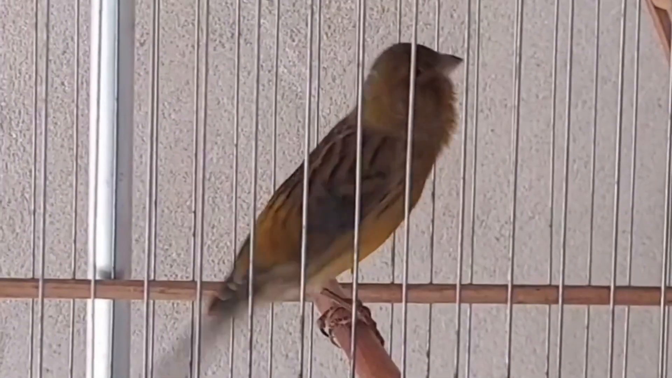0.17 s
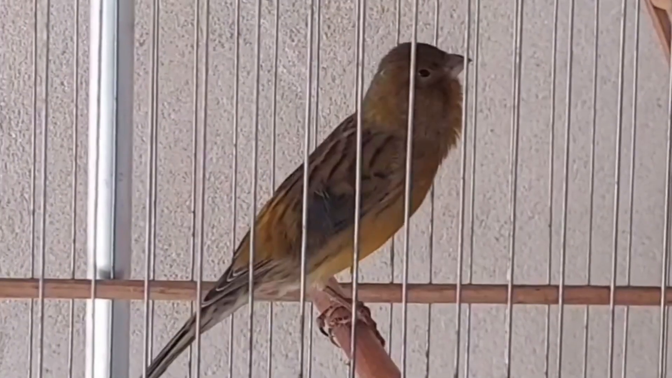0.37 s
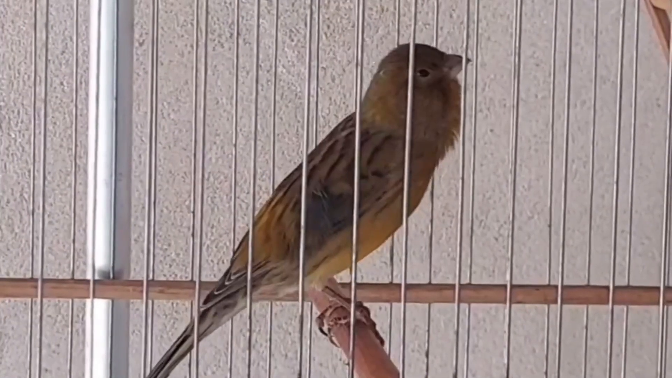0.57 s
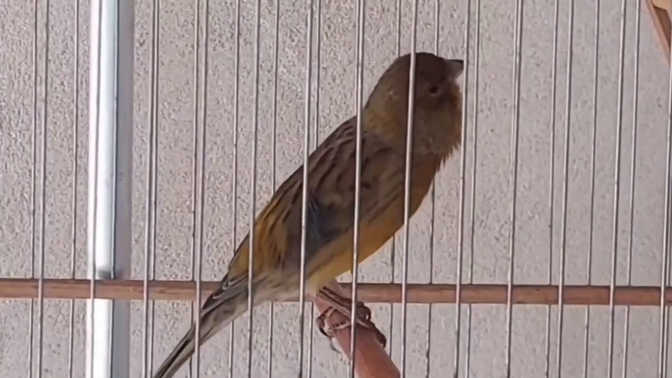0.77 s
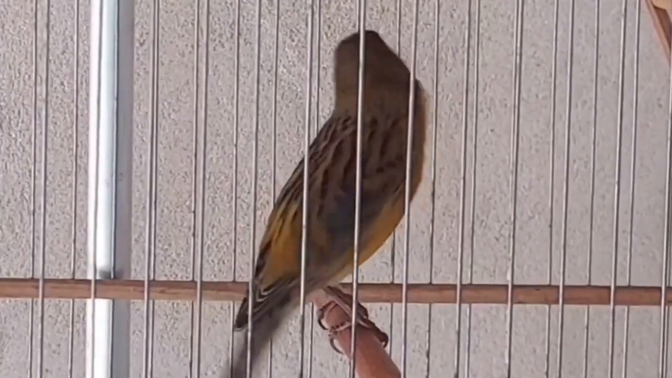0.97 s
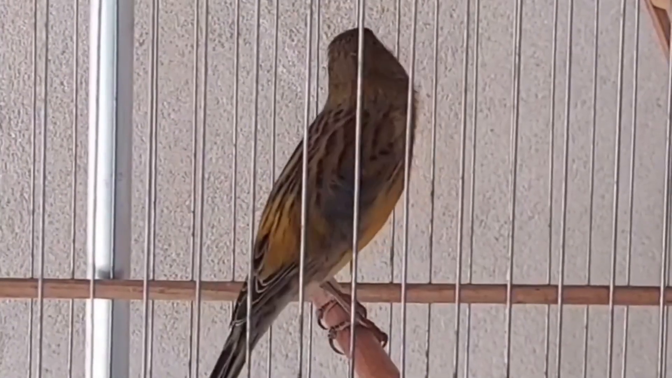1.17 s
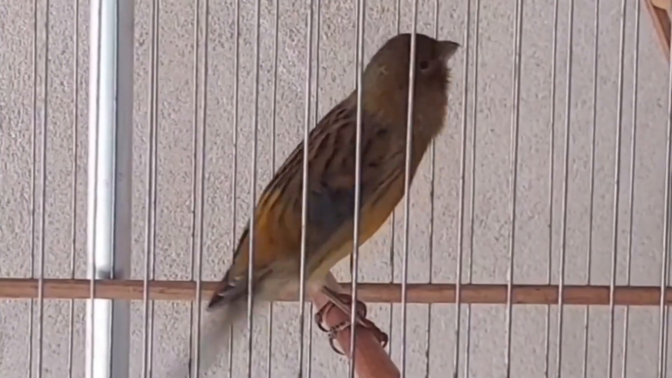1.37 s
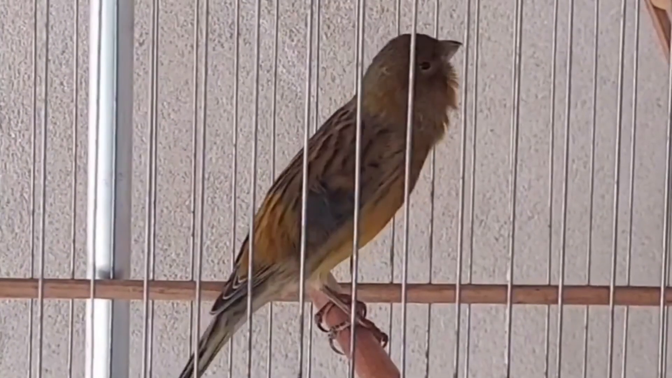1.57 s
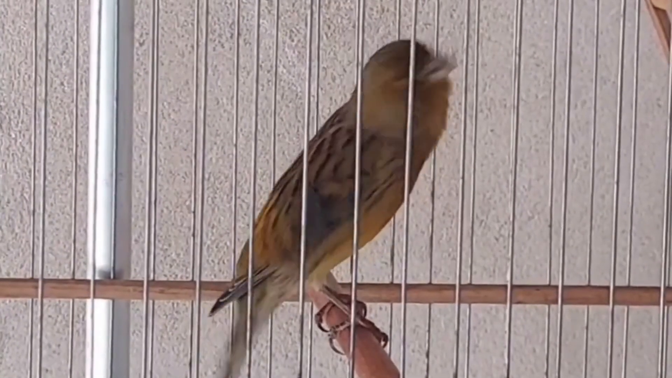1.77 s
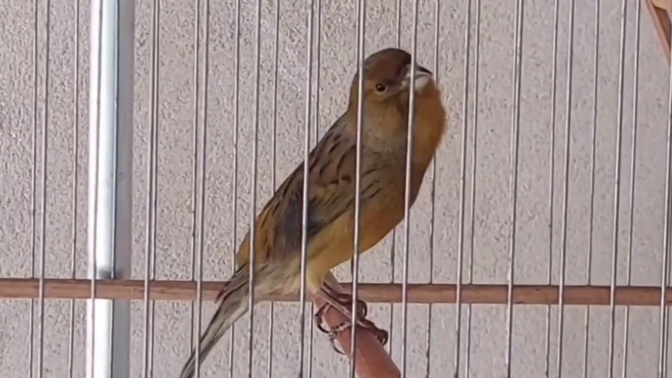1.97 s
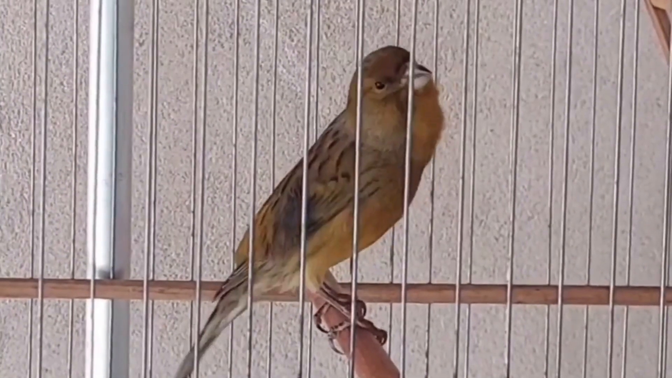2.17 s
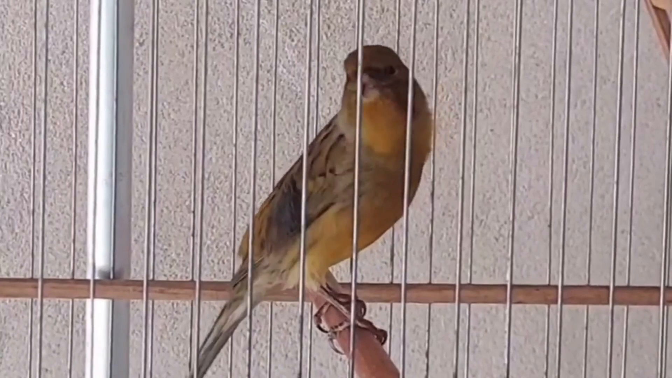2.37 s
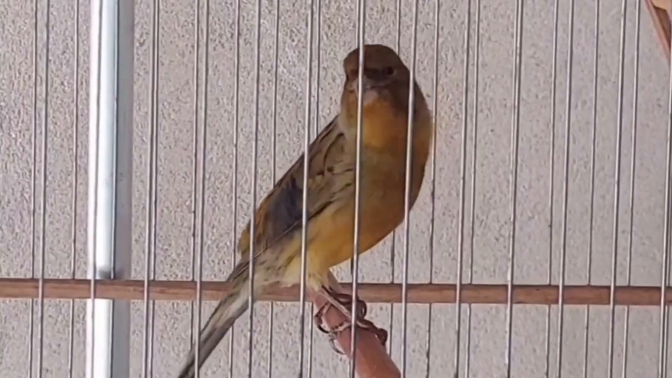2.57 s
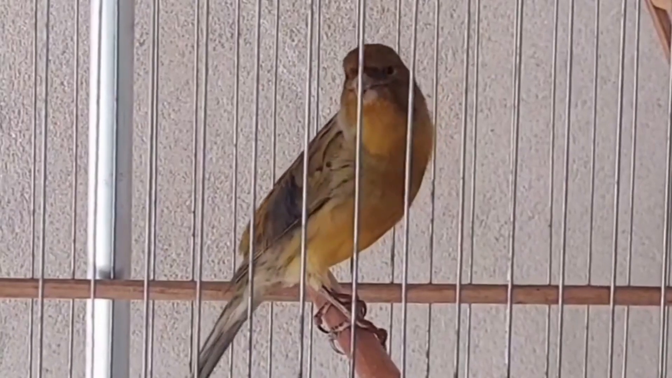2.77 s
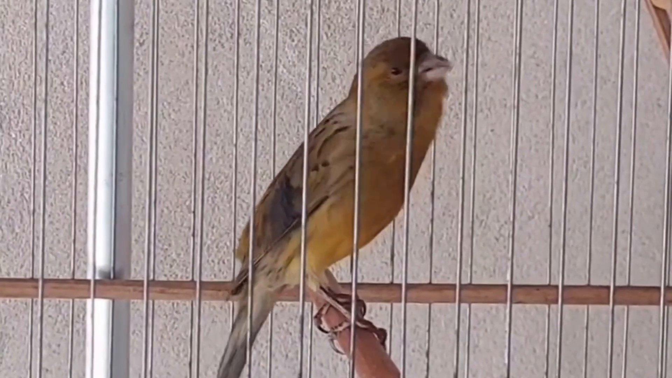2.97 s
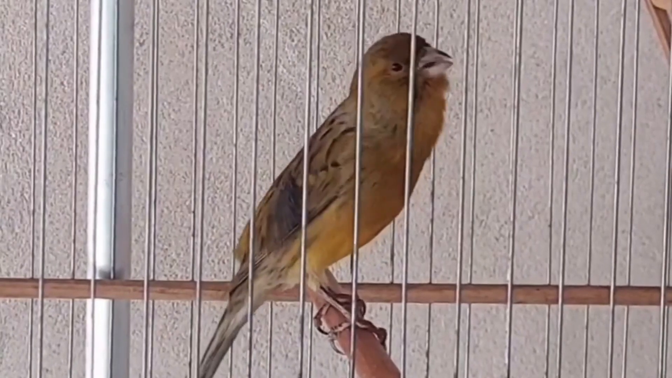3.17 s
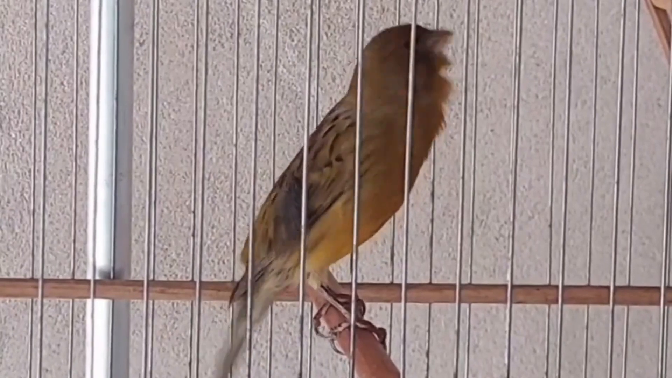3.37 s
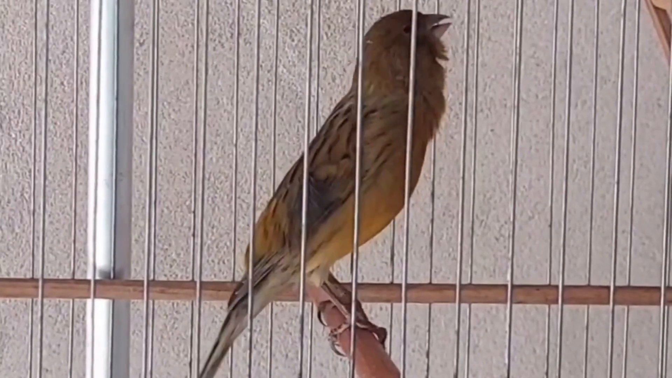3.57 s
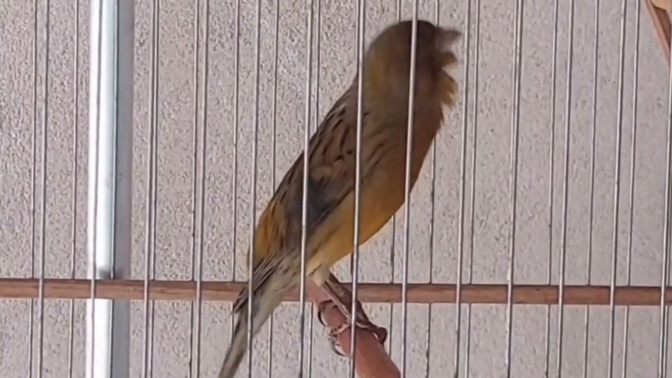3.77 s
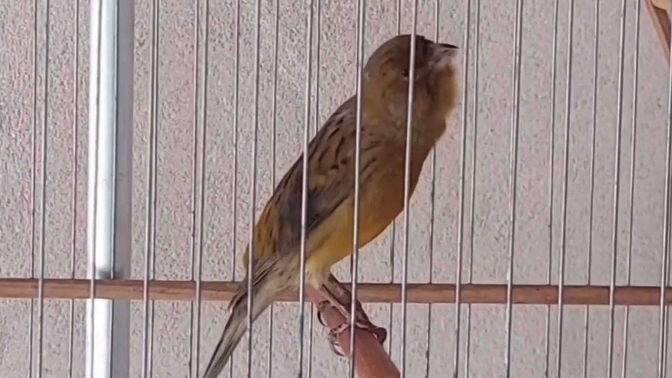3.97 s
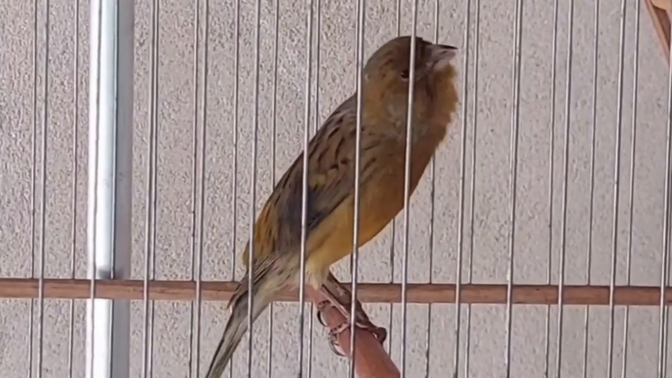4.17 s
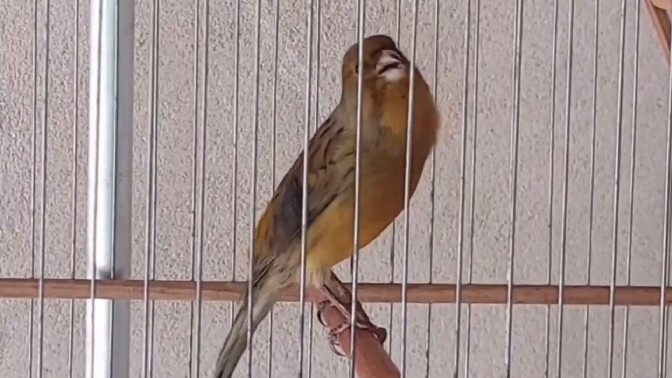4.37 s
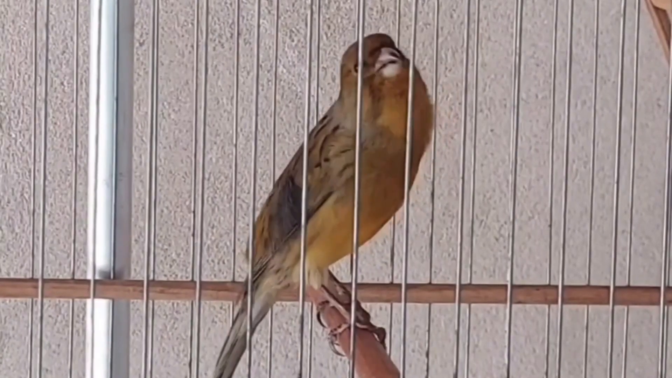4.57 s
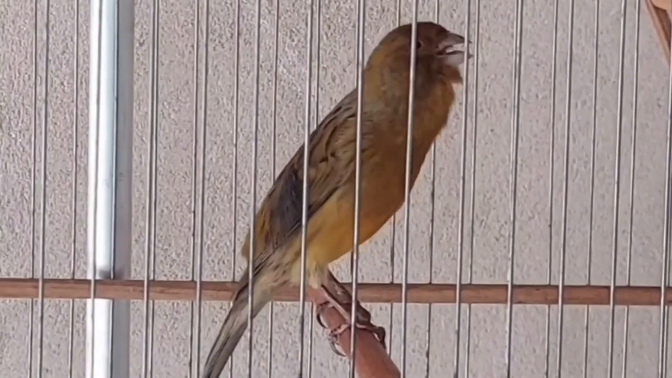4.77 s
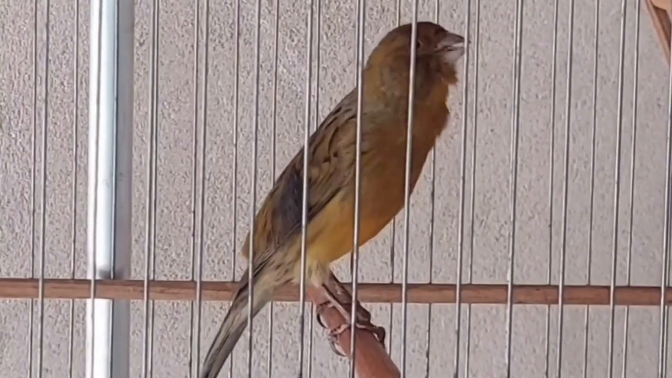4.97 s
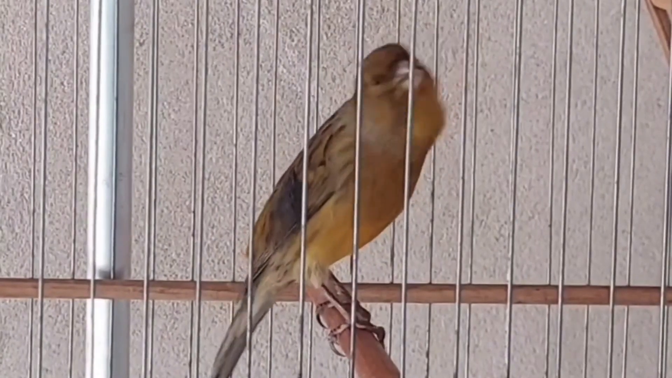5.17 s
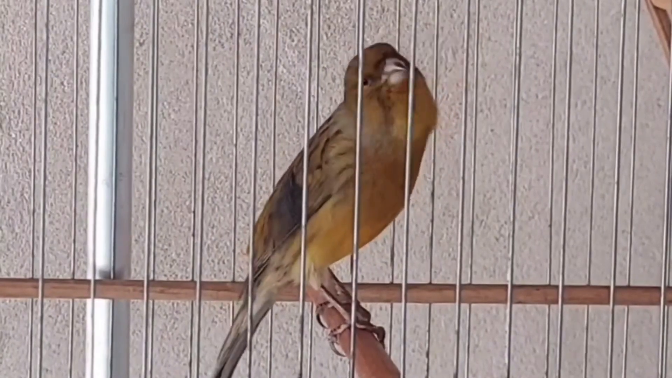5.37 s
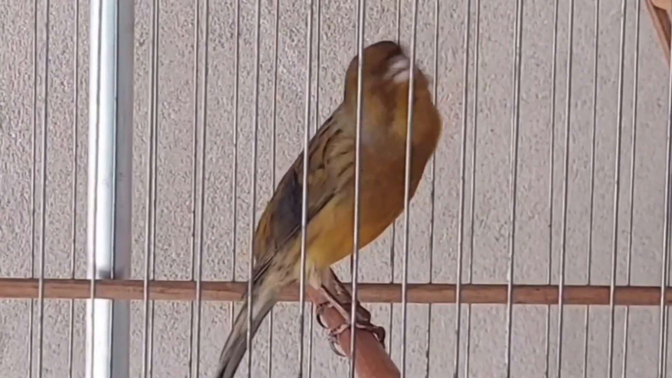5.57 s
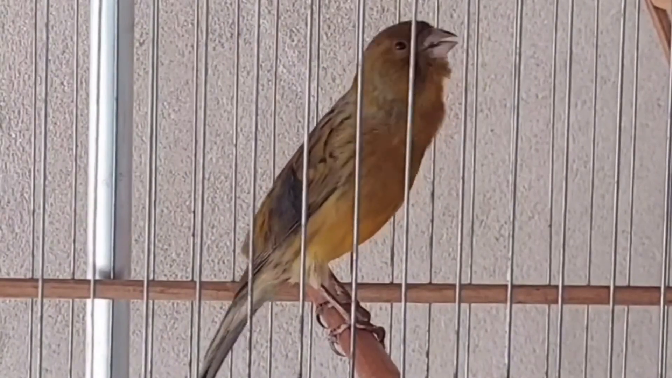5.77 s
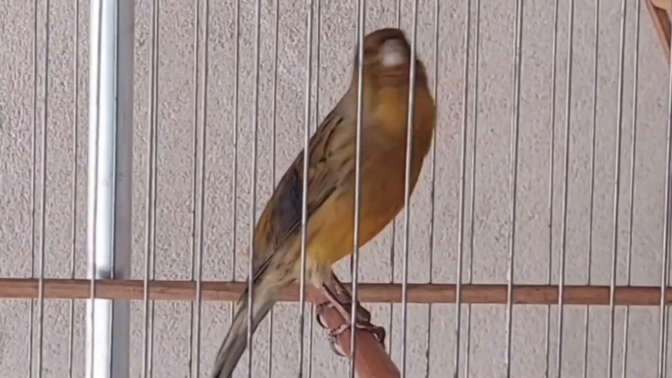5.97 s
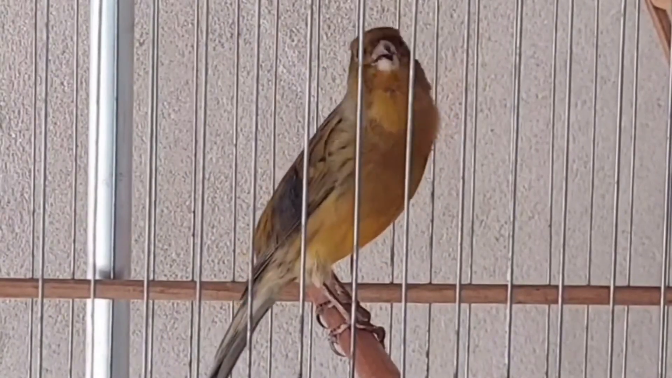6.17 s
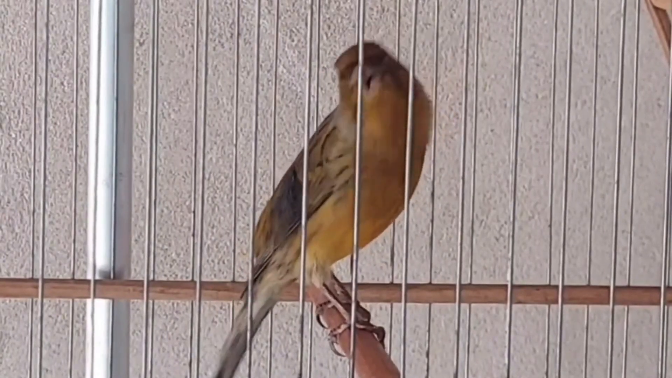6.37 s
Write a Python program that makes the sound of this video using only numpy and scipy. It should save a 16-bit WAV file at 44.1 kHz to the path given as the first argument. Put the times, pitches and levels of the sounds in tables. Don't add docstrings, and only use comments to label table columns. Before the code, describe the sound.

A caged canary sings close by in a bright hard-walled room: a fast chirping trill, a short gap, then falling whistles growing longer and slower.

```python
import sys
import numpy as np
from scipy import signal
from scipy.fft import rfft, irfft
from scipy.io import wavfile
from scipy.ndimage import uniform_filter1d

SR = 44100
rng = np.random.default_rng(int(sys.argv[2]) if len(sys.argv) > 2 else 0)


def boost_factor(decibels):
    exponent = np.asarray(decibels, float) / 20
    return 10 ** exponent


def transcribe(signal):
    frames = np.atleast_2d(signal).T
    limited = np.clip(frames, -1, 1)
    pcm = np.round(limited * 32767).astype(np.int16)
    wavfile.write(sys.argv[1], SR, pcm)


N = 286650
T = np.arange(N) / SR


def curves(table):
    s, *columns = np.transpose(table)
    return [np.interp(T, s, column) for column in columns]


def walk(rate_hz):
    hold = int(SR / rate_hz)
    steps = np.repeat(rng.standard_normal(N // hold + 1), hold)
    return 1.6 * uniform_filter1d(uniform_filter1d(steps, hold), hold)[:N]


def shaped(x, points):
    hz, db = np.transpose(points)
    log_f = np.log(np.fft.rfftfreq(x.shape[-1], 1 / SR) + 1)
    gain = boost_factor(np.interp(log_f, np.log(hz), db, left=-90, right=-90))
    return irfft(rfft(x) * gain, x.shape[-1])


def band(x, lo_hz, hi_hz):
    return x / np.std(shaped(x, [(lo_hz, 0), (hi_hz, 0)]))


# f/Hz, likeness (0-1)
LIKENESS = [(40, .6), (130, 0.78), (290, 0.84), (630, 0.44), (1400, 0)]


def stereo_noise():
    hz, like = np.transpose(LIKENESS)
    log_f = np.log(np.fft.rfftfreq(N, 1 / SR) + 1)
    like = np.clip(np.interp(log_f, np.log(hz), like), 0, 1)
    mid, side = rfft(rng.standard_normal((2, N)))
    return irfft(mid * np.sqrt(1 + like) + side * np.sqrt(1 - like) * np.array([[1], [-1]]), N)


# t/s, level/dB
ROAD = [(0, -53.5), (.95, -52.5), (1.7, -49), (3.3, -52.5), (4.4, -56), (5.65, -56), (6.5, -54)]
# f/Hz, level/dB per Hz
ROAD_COLOUR = [(15, -61), (25, -29), (43, -14.5), (94, -4.5), (173, -8), (199, -7.5), (253, -6), (356, -12),
               (810, -12), (945, -17), (1500, -19.5), (1950, -50), (3300, -120)]
# middle t/s, length/s, f/Hz, level/dB
DRONES = [(.13, 0.45, 175, -51), (0.52, .2, 184, -53), (1.2, 0.82, 171, -50.5), (1.8475, 1.8, 175.7, -57),
          (2.37, .25, 177, -54), (3.051, 0.45, 174, -48), (3.25, 0.21, 172, -48),
          (3.62, 0.27, 173.5, -46.5), (3.828, 0.24, 165, -43), (4.073, .3, 169, -50.5),
          (4.596, .15, 171, -57), (0.85, 0.17, 245, -48), (1.165, 0.59, 246, -45),
          (2.103, 1.58, 255.6, -49), (2.908, 0.41, 255.5, -48), (3.5, 0.77, 180, -51),
          (1.77, 2.9, 340, -57.5), (0.025, .25, 120, -53.5), (1.9, 0.67, 156, -49), (3.6, 0.43, 138, -59),
          (1.07, .5, 140, -52.5), (4.55, 1.4, 210, -57), (2.3, 6.4, 140, -60), (2.26, 5.2, 160, -52)]
# multiple of its pitch, level/dB when nearest
ENGINE_ORDERS = [(1, -52.5), (2, -52), (3, -53)]
# f/Hz, level/dB per Hz
HISS = [(3060, -29), (5200, 14.5), (10100, 11), (10700, -24), (11200, -59), (13100, 3.5), (14000, -27)]


def traffic():
    (road_db,) = curves(ROAD)
    road = shaped(stereo_noise(), ROAD_COLOUR)
    rumble = shaped(road, [(20, 5), (120, 2.0), (140, -24)])
    out = band(road - rumble, 312, 782) * boost_factor(road_db + 0.54 * walk(8.4))
    rumble_db = -52.5 + 0.63 * (road_db - road_db.mean())
    out += band(rumble, 45, 130) * boost_factor(rumble_db + np.array([[-1.5], [1.5]]))

    turns = np.cumsum(1 + 0.0082 * walk(6.5)) / SR
    flicker = boost_factor(walk(8))
    for middle_s, length_s, hz, db in DRONES:
        swell = np.cos(np.pi * np.clip((T - middle_s) / length_s, -.5, .5)) ** 2
        out += np.sqrt(2) * boost_factor(db) * swell * flicker * np.sin(2 * np.pi * hz * turns)

    engine_hz, nears_db_per_s, abreast_s = 81.4, 17.5, 6.2
    near = boost_factor(nears_db_per_s * np.minimum(T - abreast_s, 0) + 1.7 * walk(4.6))
    for order, db in ENGINE_ORDERS:
        out += np.sqrt(2) * near * boost_factor(db) * np.sin(2 * np.pi * order * engine_hz * T + order)

    murmur = shaped(rng.standard_normal((2, N)), [(1500, 7), (5200, -9.5)])
    out += band(murmur, 1000, 3900) * boost_factor(road_db - 6.0)
    hiss = shaped(rng.standard_normal((2, N)), HISS)
    return out + band(hiss, 5200, 21000) * boost_factor(-60.5)


# f/Hz, t60/s, level/dB
ROOM = [(1100, 1, -27.5), (2000, 0.93, -21.5), (3200, 0.73, -22), (5000, 0.58, -22.5), (7570, 0.99, -21),
        (12600, 0.67, -33)]
# t/s, left level/dB, right level/dB
ECHOES = [(.003, -9, -19.5), (.007, -13.5, -6), (.012, -11.5, -19), (.019, -10, -13), (.036, -14, -13.5)]


def room(x):
    t = np.arange(SR) / SR
    response = np.zeros((2, SR))
    mode_hz, mode_db = 12, 1.4
    modes = signal.lfilter([1], [1, 1 / mode_hz - 1], rng.standard_normal(SR // 2 + 1)) * np.sqrt(2 / mode_hz)
    mode_gain = boost_factor(mode_db * modes - 0.86)
    for k, (hz, t60, db) in enumerate(ROOM):
        below_hz = ROOM[k - 1][0] if k > 0 else hz / 2
        above_hz = ROOM[k + 1][0] if k + 1 < len(ROOM) else 16000
        noise = shaped(rng.standard_normal((2, SR)), [(below_hz, -30), (hz, db), (above_hz, -30)])
        noise = irfft(rfft(noise) * mode_gain, SR)
        decay = np.log(1000) / t60
        response += noise * np.exp(-decay * t) * np.sqrt(2 * decay / SR)
    response *= boost_factor(22.5) * np.minimum(t / 0.017, 1)
    response = response + 0.048 * response[::-1]
    for s, left_db, right_db in ECHOES:
        arrival = (np.array([s, 1.12 * s]) * SR).astype(int)
        response[[0, 1], arrival] += boost_factor([left_db, right_db]) * rng.choice([-1, 1])
    lead = int(.202 * SR)
    song = np.r_[x[:lead], x]
    return signal.fftconvolve(song[None], response, axes=1)[:, lead:lead + N]


# t/s, level/dB, top f/Hz, chirp length/s
TRILL = [
    (.011, -39.5, 4330, .012),
    (.214, -29, 4327, .015),
    (.411, -29, 4213, .013),
    (.505, -27.5, 4228, .014),
    (.6, -27.5, 4212, .015),
    (.801, -26.5, 4180, .016),
    (.97, -29, 4174, .017),
    (1.082, -24.5, 4134, .018),
    (1.334, -24, 4060, .022),
]
CHIRPS_SO_FAR = [0, 6, 12, 15, 18, 24, 29, 32, 38]
# share of length (0-1 and ringing on), share of top pitch (0-1), level/dB
CHIRP = [(0, .40, -23.5), (0.121, .5, -10.5), (0.402, .76, -4), (0.622, .92, 2.5), (.9, 0.97, -13),
         (1.251, 0.95, -15), (1.5, 0.99, -32)]


def chirps():
    share, pitch, db = np.transpose(CHIRP)
    number = np.arange(CHIRPS_SO_FAR[-1] + 1)
    effort = [np.interp(number, CHIRPS_SO_FAR, column) for column in np.transpose(TRILL)]
    pushes = rng.standard_normal(len(number))
    tracks = []
    for s, level_db, top_hz, length_s, push in zip(*effort, pushes):
        hz = pitch * top_hz * (1 + .011 * push)
        tracks.append(np.transpose([s + share * length_s, hz, db + level_db + 1.04 * push]))
    return tracks


def phrase(shape, notes):
    share, hz, db = np.transpose(shape)
    done = np.clip(share, 0, 1)
    tracks = []
    for s, length_s, lag_s, early_db, late_db in notes:
        t = s + share * length_s + lag_s * np.sin(np.pi * done)
        tracks.append(np.transpose([t, hz, db + early_db + (late_db - early_db) * done]))
    return tracks


# share of length (0-1 and ringing on), f/Hz, level/dB under the note's strength
BROKEN = [(0, 5000, -10), (.11, 4730, -1), (.2, 4580, -4), (.34, 4171, -16), (.7, 3656, -16.5),
          (.99, 2880, -.5), (1.11, 2000, -17), (1.18, 1212, -14)]
SPLIT = [(0, 4956, -13), (.06, 4795, -2.5), (.18, 4573, -1.5), (.32, 4200, -13), (.44, 3979, -27),
         (.7, 3550, -24), (.99, 2930, -.5), (1.1, 2051, -15.5), (1.17, 1300, -26.5)]
DOUBLE = [(0, 5000, -11), (.22, 4460, -1.5), (.52, 3787, -4), (.8, 3312, -21), (.99, 2903, 1),
          (1.13, 1900, -21.5), (1.17, 1240, -18)]
LOWERED = [(0, 5000, -14), (.2, 4536, -6), (.38, 4150, -2), (.55, 3804, -4.5), (.76, 3363, -16.5),
           (.99, 2915, -2), (1.09, 2500, -7.5), (1.16, 1796, -25.5)]
LONG = [(0, 5500, -6), (.08, 5052, -15.5), (.24, 4708, -5), (.52, 3820, -3.5), (.66, 3450, 2),
        (.8, 3000, -3), (.99, 2110, -10.5), (1.06, 1700, -25), (1.13, 1203, -28.5)]
HIGH = [(0, 6987, -24), (.09, 6048, -25), (.15, 5796, -14.5), (.26, 5350, -8.5), (.46, 4492, -2),
        (.6, 3915, -7), (.72, 3435, 2), (.99, 2020, -12), (1.07, 1489, -34)]
SLOW = [(0, 4795, -7.5), (.075, 4550, 1), (.14, 4112, -1.5), (.25, 3568, 2.5), (.35, 3114, -2.5),
        (.51, 2633, -3), (.69, 2220, -13.5), (.94, 1676, -26), (.99, 1162, -31.5)]
# start t/s, length/s, lag of the middle/s, early level/dB, late level/dB
BROKEN_NOTES = [
    (1.525, .080, -0.0021, -23.5, -20),
    (1.662, 0.073, 0.0056, -19, -18.5),
    (1.795, 0.076, 0.0035, -15, -20),
    (2.186, .071, -.002, -15, -20.5),
]
SPLIT_NOTES = [(1.93, 0.074, -.002, -18.5, -15), (2.057, 0.071, 0.002, -15, -17)]
DOUBLE_NOTES = [(2.314, 0.067, -.001, -14, -17), (2.449, 0.074, .001, -18, -15.5),
                (2.595, .079, .001, -13, -16.5), (2.735, .079, -.001, -11, -16.5)]
LOWERED_NOTES = [(2.874, 0.073, 0.0059, -12, -16), (3.015, .075, .003, -12, -13.5),
                 (3.156, .082, .001, -11, -17.5), (3.305, .073, 0.0044, -10, -15.5),
                 (3.442, 0.073, 0.002, -11.5, -17.5)]
LONG_NOTES = [(3.612, 0.11, -.003, -20.5, -15), (3.812, 0.11, .001, -17, -13),
              (4.022, 0.098, .001, -17, -13), (4.234, .110, -.002, -19, -13.5),
              (4.446, .120, -0.0025, -14, -16)]
HIGH_NOTES = [(4.640, 0.16, -0.0017, -14.5, -16.5), (4.882, .170, 0.0014, -18, -13),
              (5.117, .180, 0.0091, -17.5, -15)]
SLOW_NOTES = [(5.376, 0.23, .011, -19, -12), (5.665, .214, -.004, -18, -14.5),
              (5.959, .217, -.001, -17.5, -14.5), (6.251, 0.23, 0.00067, -15.5, -15.5)]
# t/s, f/Hz, level/dB
PIPS = [
    (3.575, 7100, -38),
    (3.984, 6883, -29.5),
    (4.193, 6890, -32),
    (4.404, 6960, -29.5),
    (5.114, 6740, -37),
]


def whistles():
    song = phrase(BROKEN, BROKEN_NOTES) + phrase(SPLIT, SPLIT_NOTES) + phrase(DOUBLE, DOUBLE_NOTES)
    song += phrase(LOWERED, LOWERED_NOTES) + phrase(LONG, LONG_NOTES)
    song += phrase(HIGH, HIGH_NOTES) + phrase(SLOW, SLOW_NOTES)
    tracks = []
    for note in song:
        s, hz, db = note[0]
        tracks.append([(s - .005, 1.018 * hz, db - 14)] + list(note))
    for s, hz, db in PIPS:
        tracks.append([(s, 1.04 * hz, db - 12), (s + .006, hz, db), (s + .013, .95 * hz, db - 8)])
    return tracks


# t/s, second level/dB, third level/dB, fourth level/dB, rushing air level/dB
OVERTONES = [(0, -32.5, -37, -67, -59), (1.45, -43, -51, -58, -68), (1.52, -28, -29, -60, -30.5),
             (2.4, -27, -43, -57, -39), (3.5, -27, -49.5, -56, -49), (3.7, -34.5, -33.5, -31.5, -37.5),
             (5.3, -32.5, -38, -32.5, -36.5), (6.5, -42, -32, -46, -52)]
# f/Hz, level/dB
THROAT = [(500, 1.5), (3300, 0), (3850, -1), (4500, 1.5), (5050, -3.5), (5500, -0.5), (20000, -0.5)]


def canary():
    hz, gain = np.full(N, 3000.), np.zeros(N)
    for note in chirps() + whistles():
        s, f, db = np.transpose(note)
        on = slice(int(s[0] * SR), int(s[-1] * SR))
        hz[on] = np.interp(T[on], s, f)
        gain[on] = boost_factor(np.interp(T[on], s, db))
    hz = uniform_filter1d(hz, size=60) * (1 + 0.0026 * walk(300) + .009 * walk(45))
    gain = uniform_filter1d(gain, size=60) * boost_factor(2.2 * walk(150))
    phase = 2 * np.pi * np.cumsum(hz) / SR
    *overtone_db, air_db = curves(OVERTONES)
    tone = np.sin(phase)
    for k, db in enumerate(overtone_db, 2):
        tone += boost_factor(db) * np.sin(k * phase) * (k * hz < .45 * SR)
    air = shaped(rng.standard_normal(N), [(10200, -28), (10700, 2.0), (11200, -6.0), (11500, -18.0)])
    air = band(air, 10000, 12000)
    return shaped(gain * (tone + boost_factor(air_db) * air), THROAT)


# t/s, left minus right level/dB, level/dB
HEAD = [
    (0, -5.5, -4),
    (1.4, -7.5, -8.5),
    (1.6, -4, -7.5),
    (2.5, -4, -2.5),
    (3.5, 1, -4),
    (4.5, -4.5, -4),
    (5.5, 0.5, -2.5),
    (6.5, -2.5, -3.5),
]


def scene():
    bird = canary() * boost_factor(1.41)
    bird = bird + boost_factor(-19) * np.roll(bird, int(.0017 * SR))
    pan_db, near_db = curves(HEAD)
    direct = np.array([np.roll(bird, 1), bird]) * boost_factor(np.array([pan_db, -pan_db]) / 2 + near_db)
    return direct + room(bird) + traffic()


# f/Hz, level/dB
MICROPHONE = [(10, 1.5), (5500, 0), (7500, -1), (9500, 1), (11000, 5), (11700, -5), (12300, 11),
              (13000, 3.5), (13800, -3.5), (14400, -34)]


def microphone(x):
    return np.tanh(1.153 * shaped(x, MICROPHONE)) / 1.268


# f/Hz, level/dB relative to the loudest band
MASK = [(700, -60.5), (1150, -34.5), (1500, -40), (1900, -40.5), (2500, -60), (4500, -37.5), (5600, -28),
        (7000, -36.5), (8500, -36), (10000, -43), (12000, -38), (14000, -43)]


def drop_masked_bands(x):
    f, _, z = signal.stft(x, SR, nperseg=2048)
    edges = np.r_[0:96:6, 96:240:12, 240:len(f):16]
    edge_hz = f[edges, None]
    owner = np.searchsorted(edges, np.arange(len(f)), "right") - 1
    power = np.add.reduceat(np.abs(z) ** 2, edges, axis=1) / np.bincount(owner)[:, None]
    db = 10 * np.log10(power.mean(axis=0) + 1e-18)
    loudest_db = db.max(axis=0)
    mask = np.interp(f[edges], *np.transpose(MASK))[:, None] + uniform_filter1d(loudest_db, size=5)
    mask = np.maximum(mask, np.where(edge_hz > 4800, -91.0, -200))
    for k in range(1, 5):
        mask[k:] = np.maximum(mask[k:], db[:-k] - 11.5 - 3.6 * k - 40 * (edge_hz[k:] < 1000))
    luck = 17.0 * uniform_filter1d(rng.standard_normal(db.shape), size=5, axis=1)
    luck = luck * np.clip(edge_hz / 6000, .3, 1)
    noise = rng.standard_normal(z.shape) + 1j * rng.standard_normal(z.shape)
    noise = np.sqrt(power[:, owner] / 2) * noise
    weak = (db < loudest_db - 34) & (edge_hz > 5600)
    z = np.where(weak[owner], 1.26 * noise + 1.52 * z, z) * (db + luck > mask)[owner]
    step = boost_factor(mask - luck + 4.5)[owner]
    z = z * step * np.round(np.abs(z) / step) / (np.abs(z) + 1e-18)
    return signal.istft(z, SR, nperseg=2048)[1][:, :N]


def low_pass(x):
    return signal.sosfilt(signal.butter(12, 15000, fs=SR, output="sos"), x)


def record(dry):
    mix = drop_masked_bands(microphone(dry))
    return low_pass(mix)


dry = scene()
out = record(dry)
transcribe(out)
```